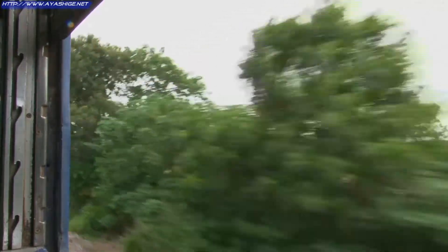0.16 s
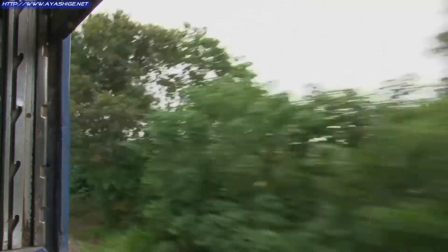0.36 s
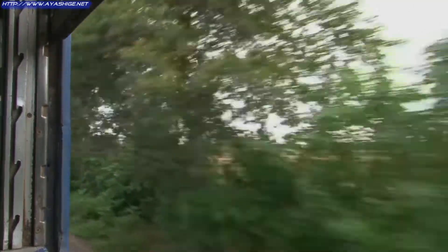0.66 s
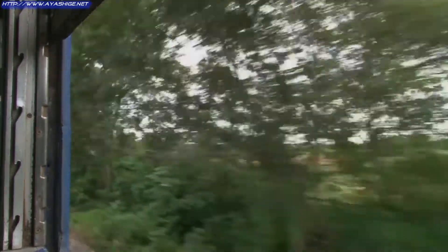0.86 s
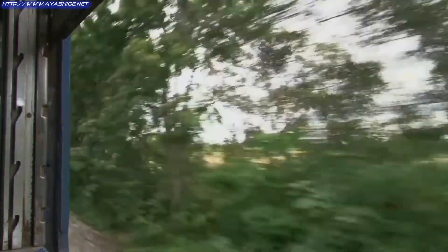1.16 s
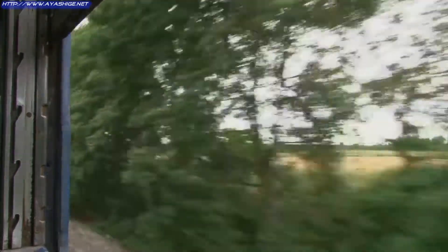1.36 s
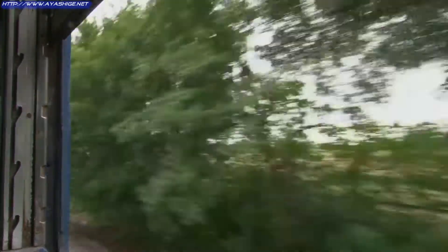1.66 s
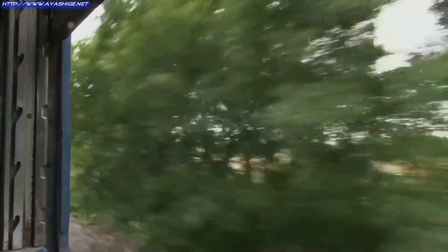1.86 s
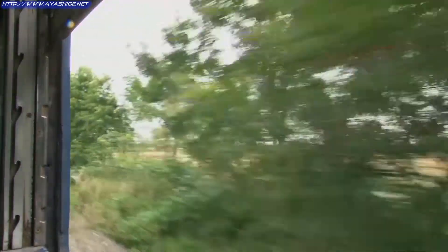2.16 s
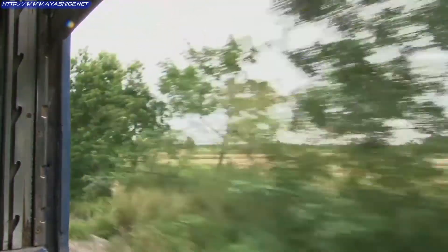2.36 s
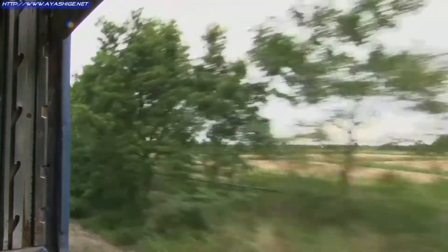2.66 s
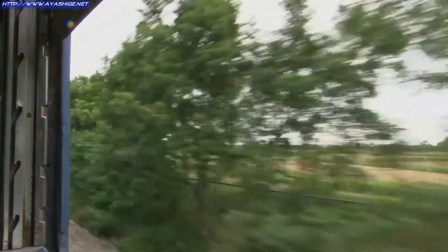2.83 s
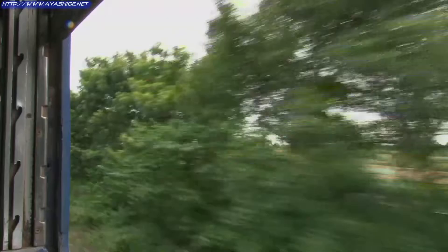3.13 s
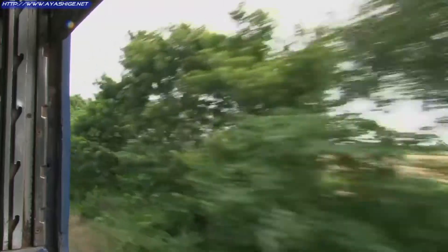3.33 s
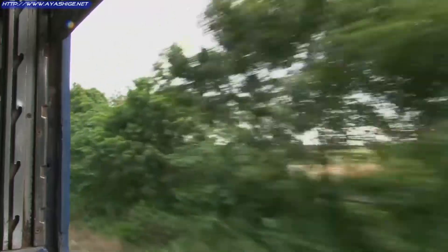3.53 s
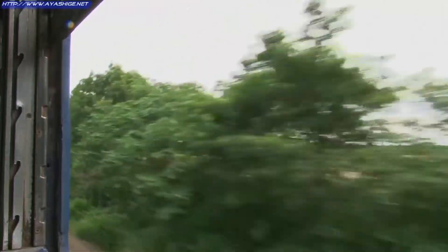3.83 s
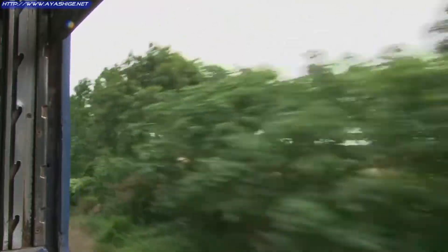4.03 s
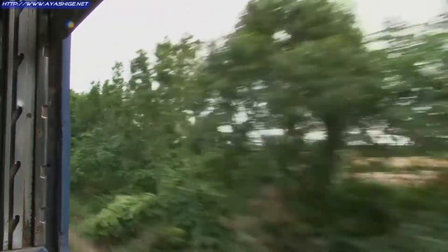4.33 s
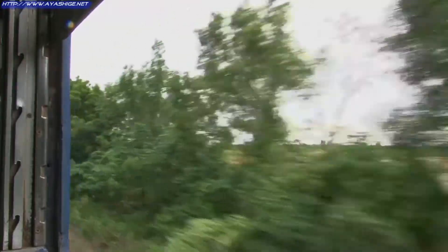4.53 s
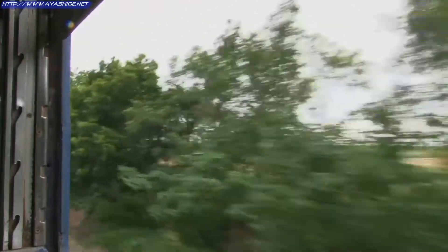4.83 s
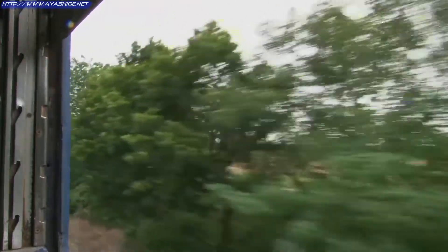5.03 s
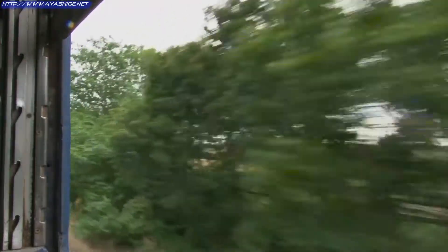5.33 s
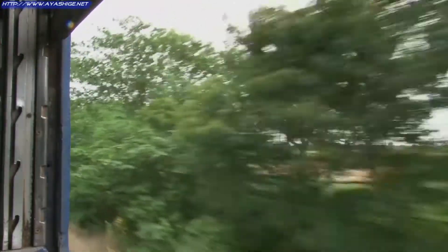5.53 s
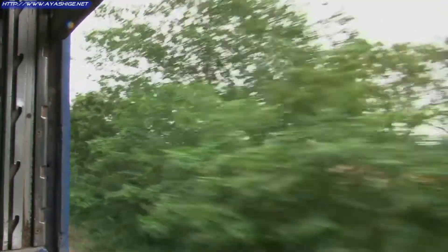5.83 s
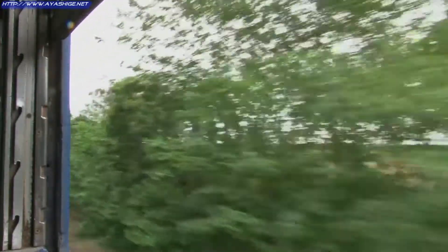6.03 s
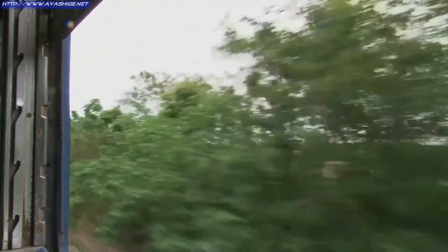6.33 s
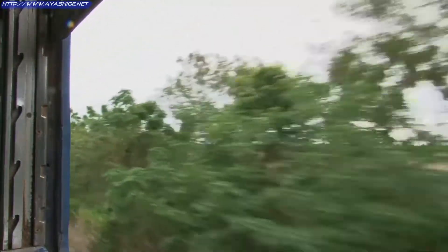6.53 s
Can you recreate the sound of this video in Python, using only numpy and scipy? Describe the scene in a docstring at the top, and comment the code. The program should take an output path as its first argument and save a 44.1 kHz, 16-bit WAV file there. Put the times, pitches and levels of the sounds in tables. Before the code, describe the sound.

Heavy, ragged wind buffets thud on a microphone while a train runs on beneath, its quiet hiss fluttering with the engine and passing trees.

```python
"""At the open window of a moving train, wind buffets a stereo microphone.
About a dozen buffets a second thump on the capsule as random trains of single pressure swings,
with short slaps on top; chokes cut the hearing for an instant.
Behind them shaped noise gives the roar of the wheels and a hiss that throbs with the engine
and swells, in gliding bands, off the passing trees."""
import sys
import numpy as np
from scipy import signal
from scipy.fft import rfft, irfft, next_fast_len
from scipy.io import wavfile
from scipy.ndimage import uniform_filter1d

SR = 44100
rng = np.random.default_rng(int(sys.argv[2]) if len(sys.argv) > 2 else 0)


def bounce(signal):
    """Save signal as a 16-bit WAV file at the path given by the first command-line argument."""
    frames = np.transpose(np.atleast_2d(signal))
    limited = np.clip(frames, -1, 1)
    pcm = np.round(limited * 32767).astype(np.int16)
    wavfile.write(sys.argv[1], SR, pcm)


N = 295029

# wind buffets: peak t/s, nominal level/dB, rise/ms and fall/ms (to 4.4 dB down),
# bass heave/(dB per octave below 160 Hz)
WIND_BUFFETS = [(0, -13, 5, 15.6, -6), (0.144, -19.5, 3.4, 10.4, -8), (0.184, -27.5, 23, 99, 3),
                (0.27, -20, 35, 37, -8), (0.346, -18.5, 19, 30, -7), (0.46, -26.5, 42, 48, 3),
                (0.553, -19.5, 8.2, 19, 0), (0.581, -29, 12, 19, 2.5), (0.712, -16, 26, 9.1, -1),
                (0.753, -14.5, 9.2, 17, -6), (0.817, -23.5, 110, 19, -4), (0.931, -13.5, 12.5, 22.4, -8.5),
                (1.017, -25.5, 11, 14, 2.5), (1.103, -20.5, 3.7, 15, 3), (1.172, -31, 58, 31, -8),
                (1.319, -28, 20, 21, -6), (1.396, -25.5, 25, 9.5, -10), (1.539, -18, 3.7, 24, 6),
                (1.575, -18.5, 17, 23, -18), (1.611, -19, 51, 35, 3), (1.724, -16.5, 16.5, 36, -5.5),
                (1.787, -28, 41, 53, -1), (1.865, -16.5, 18, 18, -4), (1.903, -16, 11, 15, -5),
                (1.966, -21.5, 13, 23, -1.5), (2.081, -18.5, 6.2, 16, 0), (2.135, -26, 23, 38, -1),
                (2.253, -19.5, 22, 35, -2), (2.334, -19.5, 8.2, 15, 0), (2.436, -15.5, 34, 31, -8),
                (2.567, -12.5, 19, 18, -18), (2.605, -20, 24, 20, -6), (2.734, -20.5, 48, 48, -3.5),
                (2.9, -18, 28, 20, -6), (2.958, -16, 26, 10.3, -8), (3.02, -13.5, 8, 12, -24),
                (3.053, -23.5, 9.3, 43, -17), (3.108, -22, 37, 11, 1), (3.228, -18, 20, 35, 0),
                (3.288, -16.5, 16, 19, -11), (3.407, -18.5, 18, 18.4, -4), (3.506, -29, 8.7, 2.1, 4.5),
                (3.653, -15.5, 7.8, 27.3, -1.5), (3.755, -22, 20, 19.6, -8), (3.87, -12.5, 25.4, 22, -3.5),
                (3.924, -19, 36, 14, -5.5), (4.088, -17, 7, 39, -8), (4.229, -15, 20, 25, -7),
                (4.297, -27, 18, 21, 1), (4.453, -16, 16, 21.4, -3), (4.558, -13.5, 4.1, 16, -3),
                (4.628, -15.5, 24, 20.4, -0.5), (4.736, -25, 9.8, 26, 1), (4.825, -30, 36, 24, -3),
                (4.953, -23.5, 37, 22, 1.5), (5.036, -17, 12, 14, -1.5), (5.071, -25.5, 27, 36, -5),
                (5.209, -19.5, 13.4, 9.4, -1), (5.232, -19, 8.1, 4.3, -3), (5.26, -20.5, 14, 39, 0.5),
                (5.493, -13, 21, 8.2, -5), (5.513, -17, 3.9, 16.6, -20), (5.632, -16, 23, 31.4, -1.5),
                (5.821, -13.5, 10.3, 11, -3), (5.85, -20.5, 15, 22.5, -13), (5.985, -18.5, 4, 13, -11),
                (6.017, -15.5, 8.4, 14, -22), (6.047, -28.5, 4.7, 16, 2), (6.086, -18, 1.2, 37, -2),
                (6.208, -34.5, 14, 12, 5), (6.276, -12, 24, 26, -23), (6.383, -24, 9.3, 42, 0),
                (6.481, -15, 18, 18.5, -4), (6.569, -19, 42, 17, -7.5), (6.624, -18, 11, 15, 8.5),
                (6.684, -16.5, 57, 18, -22)]
# relative spectral density of the eddies: f/Hz, level/dB
EDDY_SPECTRUM = [(20, 8), (32, 9), (45, 5.5), (97, 8), (280, -3.5), (556, -13), (886, -21.5), (1410, -35),
                 (2400, -44.5)]
# small eddies differ more between the ports: f/Hz, added side level/dB
EDDY_SIDE_SPECTRUM = [(25, -16), (60, -37), (120, -9), (300, 2.5), (1000, 12), (2400, 21)]
# surges of pressure that pin the capsule: t/s, change of hearing/dB
CAPSULE_CHOKES = [(0.748, -22), (0.7947, -5), (1.542, -13), (1.6098, -44), (1.752, -9), (2.555, -11),
                  (2.575, -18), (2.8918, -15), (3.249, -16), (3.277, -6), (3.895, -17), (4.245, -20),
                  (4.639, -8), (5.4828, -15), (5.609, -32), (5.652, -9), (5.827, -8), (6.2536, -20),
                  (6.4669, -25), (6.632, -9)]
# running noise between the trees: t/s, hiss level/dB, roar level/dB
RUNNING_LEVELS = [(0.0, -38, -39), (0.499, -40.5, -36.5), (0.9, -38, -36.5), (1.05, -37, -36.5),
                  (1.3, -34.5, -37), (1.535, -33.5, -34), (1.548, -33.5, -29), (1.68, -38.5, -42),
                  (2.1, -37.5, -41), (2.42, -35.5, -34.5), (2.55, -40, -43), (3.05, -40, -38),
                  (3.5, -38.5, -42.5), (4.05, -40.5, -41.5), (4.5, -37, -39), (4.72, -38, -34.5),
                  (5.3, -36.5, -36), (5.95, -36, -35.5), (6.45, -35.5, -37.5), (6.69, -36, -35)]
# relative spectral density of the wheel roar: f/Hz, level/dB
ROAR_SPECTRUM = [(25, -9), (100, 5.5), (400, 0.5), (600, 3), (850, -0.5), (1050, 5), (1150, 0.5),
                 (1280, -4.5), (1520, -17), (2200, -49)]
# relative spectral density of the treble hiss: f/Hz, level/dB
HISS_SPECTRUM = [(1100, -4.5), (1520, -12), (1820, -2.5), (2600, -3), (3500, -4), (4200, -4.5),
                 (5100, -6.5), (5900, -7.5), (8530, -13.5), (11000, -26), (14400, -39.5), (15600, -55)]
# stereo width of the running noise: f/Hz, side relative to mid/dB
NOISE_WIDTH = [(100, -19), (400, -50), (1100, -27), (1500, -11), (2300, -18), (2900, -11), (3350, -4),
               (4200, -12.5), (5300, -7), (6400, -9), (7500, -7.5), (9000, -10.5), (11000, -18),
               (12500, -19), (14000, -10)]
# sharpest slaps of air: t/s, nominal swing level/dB, f/Hz, edge level relative to the swing/dB
AIR_SLAPS = [(0.008, -13.5, 487, -12), (0.143, -15.5, 396, -12), (0.285, -15, 407, -12),
             (0.341, -14, 200, -25), (0.3484, -13, 376, -21), (0.459, -20.5, 500, -10),
             (0.545, -15, 358, -17), (0.586, -17, 200, -20), (0.708, -23, 188, -16),
             (0.752, -10.5, 493, -24), (0.816, -15, 190, -18), (0.927, -23, 223, -14),
             (0.9406, -20, 420, -2), (1.107, -29, 250, -12), (1.539, -30, 180, -25), (1.5513, -12, 404, -6),
             (1.6033, -13, 457, 0.5), (1.616, -10.5, 510, -21), (1.7121, -16, 450, -1),
             (1.845, -14, 334, -16), (1.8731, -10, 378, -26), (1.975, -24, 400, 3), (2.082, -23, 230, -16),
             (2.255, -14.5, 506, -5), (2.335, -17, 199, -18), (2.406, -18, 495, -16),
             (2.427, -10, 260, -11), (2.4457, -9, 306, -19), (2.542, -19, 400, -14), (2.5568, -8, 746, -6),
             (2.58, -14, 315, -23), (2.608, -10.5, 260, -11), (2.756, -13, 230, -23),
             (2.894, -16, 400, -10), (2.959, -25, 320, -14), (3.0247, -27, 460, -22),
             (3.107, -15.5, 200, -22), (3.216, -19, 300, -10), (3.29, -25, 352, -12),
             (3.299, -18, 314, -16), (3.4013, -11.5, 440, -11), (3.651, -15, 255, -14),
             (3.673, -15, 316, -6), (3.846, -21, 400, -15), (3.8604, -4.5, 510, -21), (3.8735, -6, 565, -2),
             (3.915, -10.5, 590, -13), (4.098, -13.5, 447, -5), (4.208, -19, 200, -16),
             (4.2223, -37, 299, 7), (4.239, -24, 345, -11), (4.4436, -17.5, 463, -4),
             (4.469, -12, 340, -21), (4.5562, -9, 288, -23), (4.57, -15, 476, -16), (4.613, -16, 390, -12),
             (4.6311, -9, 338, -10), (4.959, -22, 229, -14), (5.03, -14, 238, -25), (5.0372, -9, 335, -17),
             (5.2, -16.5, 292, -16), (5.26, -19, 300, -10), (5.468, -11, 310, -21), (5.4892, -7, 376, -5),
             (5.516, -13, 230, -20), (5.525, -14, 231, -18), (5.6138, -17, 300, -18),
             (5.6246, -16, 440, -2), (5.6459, -15, 396, -2), (5.809, -16, 420, -7),
             (5.8152, -12.5, 403, -25), (5.8298, -11, 300, -16), (5.832, -13, 302, -14),
             (5.857, -13, 360, -16), (6.016, -12.5, 264, -13), (6.0889, -6.5, 346, -8),
             (6.1033, -21, 443, -11), (6.256, -20, 402, -16), (6.274, -8.5, 256, -8), (6.281, -15, 380, -2),
             (6.2934, -18, 334, 1), (6.3, -14, 400, -8), (6.384, -15, 200, -18), (6.474, -29, 350, -10),
             (6.4809, -13.5, 362, -19), (6.4931, -23, 530, 2), (6.651, -34, 505, -17),
             (6.675, -20, 360, -9)]
# uneven firing of six cylinders: t into the engine cycle/ms, relative puff level/dB
CYLINDER_FIRINGS = [(2, 3.2), (16, 3.4), (26, 3.3), (40, 1.8), (50, 1.6), (64, 1.7)]
# phase of the ports: f/Hz, lead of left over right/rad
PORT_PHASE = [(0, 0), (800, 0), (1210, -0.1), (1720, -0.9), (3100, 0.9), (3790, -0.6), (5080, 0.8),
              (6200, -0.1), (7490, 0.6), (10700, 0), (15200, 0)]
# balance of the ports: f/Hz, left minus right/dB
PORT_LEVEL = [(30, 1.5), (60, -1), (130, -0.4), (290, -1), (640, 0), (1220, 1.5), (2000, -2), (3300, 0),
              (6820, 0), (15000, 0.5)]
# trees that throw the hiss back: t/s, swell of the whole hiss/dB, nominal extra in the brightest band/dB,
# length either side of the peak (to 1/e)/ms, brightest f/Hz, glide/(octaves per length)
PASSING_TREES = [(0.01, 4, -4, 9.1, 4000, 0), (0.33, 2, 2.5, 130, 2400, -0.052),
                 (0.6, 4, 3, 103, 2540, 0.34), (0.68, -1, 6, 35, 6000, -.1), (0.71, 2.5, 6.5, 83, 2570, 0),
                 (0.84, 3, 6, 36, 2970, 0), (0.91, 3.5, 0, 28, 2500, 0), (1.1, 1.5, 1, 130, 3500, 0),
                 (1.03, 1.5, 1.5, 70, 2300, -0.15), (1.25, 0.5, 4.5, 110, 2050, 0),
                 (1.33, -0.5, 2.5, 110, 3260, 0), (1.4, 0, 3.5, 47, 3550, 0), (1.46, 2.5, 2, 37, 2900, 0),
                 (1.49, 1, 2, 85, 2280, 0.14), (1.48, 0.5, 1.5, 33, 4950, 0.039),
                 (1.52, 2.5, -2.5, 21, 5500, 0), (2.25, 0, 5, 28, 3900, -0.062),
                 (2.295, 0.5, 4, 23, 5800, -0.036), (2.285, -0.5, 4, 25, 5000, -0.043),
                 (2.295, 4.5, 3, 68, 2850, -0.31), (2.36, -1.5, 6, 48, 2080, -.15),
                 (2.425, 2.5, 3, 24, 4530, 0), (2.88, -0.5, 7, 25, 5540, -0.048),
                 (2.92, 3, 5, 110, 2420, -0.21), (3.2, 1.5, 5, 23, 4700, 0.08), (3.28, 3, -5, 32, 3000, 0),
                 (3.33, 0.5, 5, 45, 5900, 0.05), (3.4, 0.5, 6.5, 43, 2360, 0),
                 (3.6, 2.5, 3.5, 49, 3200, 0.042), (3.68, 0, 9, 28, 2500, -0.3),
                 (3.73, 3.5, 3, 100, 3300, 0.29), (3.85, 1.5, 1, 45, 9000, 0.13),
                 (3.97, 1.5, 2, 32, 4300, 0), (4.135, 1.5, 8, 21, 5900, 0),
                 (4.175, 0.5, 8, 40, 2160, -0.11), (4.178, 2.5, 4, 18, 2680, 0.052),
                 (4.225, 2, 6, 10, 2200, 0), (4.26, 2, 11, 48, 2720, -0.079), (4.585, 3, 4, 17, 4200, 0),
                 (4.6, 2, 3.5, 30, 6500, -.2), (4.645, 4.5, 2, 35, 3960, 0), (4.71, 1.5, 6, 20, 4000, 0),
                 (4.775, 1.5, 5, 39, 5900, 0.027), (4.78, -0.5, 3, 20, 4000, 0),
                 (4.845, 1, 4, 57, 7360, -0.47), (4.87, 2, 3, 28, 5800, 0.12), (4.95, 3, 1, 39, 4800, 0),
                 (5.0, 2, 2, 40, 2840, 0), (5.18, 3.5, 3.5, 82, 3500, -0.14),
                 (5.39, -1, 6, 36, 3400, 0.096), (5.43, 3.5, 4, 66, 5500, -0.11),
                 (5.57, 1.5, 3.5, 21, 4100, 0), (5.78, 0.5, 5, 30, 4600, 0), (5.75, 2, 2, 23, 3200, 0),
                 (6.0, 1, 6, 25, 4250, 0.089), (6.08, 3, 2, 27, 4300, -0.063), (6.13, 2, 2.5, 30, 4300, 0),
                 (6.2, 2.5, -1, 58, 3000, 0), (6.29, 3, 4, 9.2, 2170, -0.071),
                 (6.36, 1.5, 0, 58, 3500, 0.045), (6.52, 2.5, 3, 20, 3750, 0.053),
                 (6.52, 0.5, 3, 25, 6200, 0)]
# firings that spit loudest in the treble: t/s, extra relative puff level/dB
TREBLE_SPITS = [(1.012, -2), (1.46, -0.5), (1.533, 4.5), (2.405, 2), (2.878, 6.5), (3.175, 5), (3.263, 0),
                (3.343, 3.5), (3.851, 1), (3.862, 6), (3.875, 2), (4.138, 1.5), (4.572, 4.5), (4.644, 3),
                (4.752, 3), (4.777, 6.5), (4.826, 4), (4.836, 7), (4.764, 1), (4.788, 4), (4.851, 4),
                (4.86, 1), (5.365, 1.5), (5.871, 1), (6.062, 4), (6.487, 2)]

EDGE_HZ = 15100  # upper band limit
CYCLE_HZ = 13.858  # engine cycles per second
PUFF_CHANCE = 0.5  # spread of the puffs, as a share of their dB
USUAL_DB, DRAUGHT_DB = -21.5, -49  # a usual buffet; the draught that never stops
SHARP, SHARP_PER_MS = 0.23, 0.023  # dB per octave above 160 Hz; longer buffets carry more small eddies
SHARP_PER_DB = 0.1518  # and so do stronger ones
SIDE_DB, SIDE_PER_DB = -13.5, -0.3  # strong buffets hit both ports more alike
FLUTTER_DB, FLUTTER_MS = 2.8, 8  # buffets break into flutters: rms depth, window length
DRAUGHT_LUMP_DB = 4  # the draught comes in lumps: rms depth
BLUNT = 2.6  # buffets start and stop abruptly (2 = bell shape)
EDDIES_PER_CYCLE = 1.3  # sparse enough that single swings stand out
CHOKE_MS = 4.2  # full width, to 1/e of the depth in dB
SWISH_OCTAVES = 0.3  # half-width (to 1/e) of a tree's brightest band
STREAK_OCTAVES, STREAK_SHARE = 0.09, 0.18  # a thin streak in its middle
SPLASH_DB = -15  # splash up into the treble, relative to a slap's edge
EDGE_SKEW = 0.54  # largest phase difference of the edge between the ports (cycles)
SLAP_TURN = 0.45  # spread of the slaps' shape (cycles)
SLAP_PAN_DB, SLAP_STRAY_DB = 4, -2.5  # left minus right from 420 Hz up: mean, largest stray


def gain_of(db):
    """Logarithmic level: 20 dB is a tenfold amplitude."""
    return 10 ** (np.asarray(db) / 20)


def evened(x):
    """Normalisation by mean power: scales to rms 1."""
    return x / np.sqrt(np.mean(x ** 2) + 1e-20)


def read(points, hz):
    """Interpolation of a spectrum along a logarithmic frequency axis."""
    f, value = np.transpose(points)
    return np.interp(np.log(hz + 1), np.log(f + 1), value)


def stereo(mid, side):
    """Sum and difference: mid and side give left and right."""
    return np.array([mid + side, mid - side])


def bunching(depth_db, length):
    """Multiplicative intermittency: smoothed noise in dB becomes a fluctuating gain."""
    smooth = signal.oaconvolve(rng.standard_normal(N), np.hanning(length), "same")
    return gain_of(depth_db * evened(smooth))


def wind():
    """Turbulence as shot noise: eddies of many sizes strike as single swings while a buffet lasts."""
    s, db, rise, fall, heave = np.transpose(WIND_BUFFETS)
    sharp = SHARP + SHARP_PER_MS * (rise + fall) + SHARP_PER_DB * (db - USUAL_DB)
    side_db = SIDE_DB + SIDE_PER_DB * (db - USUAL_DB)
    step = 32  # samples between control points
    t = np.arange(0, N + step, step) / SR
    late_ms = 1000 * (t[:, None] - s)
    lateness = abs(late_ms / np.where(late_ms < 0, rise, fall))
    power = gain_of(db - 4.4 * np.minimum(lateness ** BLUNT, 20)) ** 2
    share = power / power.sum(1, keepdims=True)  # the strongest buffet of the moment sets the colour
    lumps = evened(uniform_filter1d(rng.standard_normal(len(t)), size=30))
    draught = gain_of(DRAUGHT_DB + DRAUGHT_LUMP_DB * lumps)
    controls = (np.sqrt(power.sum(1) + draught ** 2), share @ sharp, share @ heave, share @ side_db)
    force, sharp, heave, side_db = (np.interp(np.arange(N) / SR, t, c) for c in controls)
    clump = bunching(1.85, 256)  # eddies come in bunches
    flutter = bunching(FLUTTER_DB, round(FLUTTER_MS * SR / 1000))
    force = force * evened(flutter)
    sizes_hz = np.geomspace(26, 3300, 15)
    norm = np.sqrt(np.sum(sizes_hz * gain_of(read(EDDY_SPECTRUM, sizes_hz)) ** 2))
    out = np.zeros((2, N))
    for hz in sizes_hz:
        u = np.arange(-2 * SR / hz, 2 * SR / hz) * hz / SR  # time in cycles
        swing = np.hanning(len(u)) * np.exp(-(u / 0.61) ** 2) * np.sin(2 * np.pi * u)
        hits = rng.choice([-1., 1.], (2, N)) * (rng.random((2, N)) < EDDIES_PER_CYCLE * hz / SR)
        octaves = np.log2(hz / 160)
        tilt_db = octaves * sharp if octaves > 0 else -octaves * heave
        colour = gain_of(read(EDDY_SPECTRUM, hz) + tilt_db) * np.sqrt(hz) / norm
        clumping = np.clip(min(hz / 200, 450 / hz), 0, 1)  # strongest for middle sizes
        size = force * clump ** clumping * colour
        trains = signal.oaconvolve(hits, swing[None], "same")
        steady = abs(uniform_filter1d(trains ** 2, round(3.0 * SR / hz))) + 1e-9
        trains = evened(trains / steady ** 0.21)  # a buffet keeps a steady supply of eddies
        out += size * trains * [np.ones(N), gain_of(side_db + read(EDDY_SIDE_SPECTRUM, hz))]
    return stereo(*out)


def noise(db):
    """Gaussian noise shaped by a dB field over frequency and time, with a width set by frequency."""
    hz = np.fft.rfftfreq(512, 1 / SR)
    a, b, c, d = rng.standard_normal((db.shape[1], 257, 4)).T
    mid = a + 1j * b
    side = gain_of(read(NOISE_WIDTH, hz))[:, None] * (c + 1j * d)
    spectra = np.array([mid, side]) * gain_of(db)
    return stereo(*signal.istft(spectra, nperseg=512, noverlap=384)[1][:, :N])


def patches(frames, bins, long):
    """Local correlation: averaged noise leaves random blotches over frequency and time."""
    across = uniform_filter1d(rng.standard_normal((frames, 257)).T, bins, 0)
    return evened(uniform_filter1d(across, long, 1))


def roar():
    """Rolling noise: wheels on rails, filtered by the car body into a mostly low-pass spectrum."""
    frames, hz = N // 128 + 5, np.fft.rfftfreq(512, 1 / SR)
    blotches_db = 2.2 * patches(frames, bins=3, long=16) + 1.2 * patches(frames, bins=12, long=24)
    sound = evened(noise(read(ROAR_SPECTRUM, hz)[:, None] + blotches_db))
    s, _, db = np.transpose(RUNNING_LEVELS)
    return sound * gain_of(np.interp(np.arange(N) / SR, s, db))


def hiss():
    """Reflection and modulation: trees swell the treble noise, and the engine throbs it most up high."""
    frames, hz = N // 128 + 5, np.fft.rfftfreq(512, 1 / SR)[:, None]
    s, db, _ = np.transpose(RUNNING_LEVELS)
    open_db = read(HISS_SPECTRUM, hz)
    field = open_db + trees_db(np.arange(frames) * 128 / SR, hz)
    # what the trees add overall
    swell = np.sqrt(np.mean(gain_of(field) ** 2) / np.mean(gain_of(open_db) ** 2))
    blotches_db = 2.03 * patches(frames, bins=2, long=12) + 0.3 * patches(frames, bins=60, long=4)
    sound = swell * evened(noise(field + blotches_db))
    low = signal.sosfiltfilt(signal.butter(1, 4500, fs=SR, output="sos"), sound)
    top = signal.sosfiltfilt(signal.butter(2, 11000, "highpass", fs=SR, output="sos"), sound)
    middle = sound - low - top
    puffs_db = firing_db()
    sound = low * gain_of(0.31 * puffs_db) + middle * gain_of(1.4 * puffs_db) + top * gain_of(1.9 * puffs_db)
    return sound * gain_of(np.interp(np.arange(N) / SR, s, db))


def firing_db():
    """Periodic pulse modulation: the level puffs up at every firing, each puff a little different."""
    cycles = np.arange(N / SR * CYCLE_HZ)[:, None] / CYCLE_HZ
    ms, db = np.transpose(CYLINDER_FIRINGS)
    at = ((cycles + ms / 1000) * SR).astype(int)
    train = np.zeros(N + SR)
    train[at] = db * (1 + PUFF_CHANCE * rng.standard_normal(at.shape))
    for s, extra_db in TREBLE_SPITS:
        train[round(s * SR)] += extra_db
    puff = np.exp(-(np.arange(-400, 401) / SR / 0.003) ** 2)
    puffs = signal.oaconvolve(train, puff, "same")[:N]
    return puffs - puffs.mean()


def slaps():
    """Pressure transient: a sudden swing about a cycle long, with a crisp edge and a treble splash."""
    out, t = np.zeros((2, N + 800)), np.arange(-400, 400) / SR
    chances = rng.random((len(AIR_SLAPS), 3))
    for (s, db, hz, edge_db), (turn, edge_turn, stray) in zip(AIR_SLAPS, chances):
        # the half-cycle offset makes slaps mostly suck the capsule outward
        swing_cycles = hz * t + .5 + SLAP_TURN * (turn - .5)
        swing = np.exp(-(t * hz / 0.5) ** 2) * np.cos(2 * np.pi * swing_cycles)
        skew = EDGE_SKEW * (stray - .5) * np.array([[1], [-1]])  # reaches one port a little early
        edge = np.exp(-(t / 0.00048) ** 2) * np.cos(2 * np.pi * (1250 * t + edge_turn + skew))
        splash = np.exp(-(t / 0.00027) ** 2) * np.cos(2 * np.pi * (2300 * t + 2 * edge_turn))
        sound = swing + gain_of(edge_db) * (edge + gain_of(SPLASH_DB) * splash)
        pan_db = SLAP_PAN_DB + SLAP_STRAY_DB * (2 * stray - 1)
        pan_db *= min(hz / 420, 1) ** 2  # deep slaps reach both ports alike
        out[:, round(s * SR):][:, :len(t)] += gain_of(db + np.array([[.5], [-.5]]) * pan_db) * sound
    return out[:, 400:N + 400]


def trees_db(t, hz):
    """Reflection from passing bodies: each tree changes the whole hiss and one band that may glide."""
    field = np.zeros((len(hz), len(t)))
    for s, db, swish_db, ms, top_hz, glide in PASSING_TREES:
        late = 1000 * (t - s) / ms  # in lengths of the swell
        off = (np.log2((hz + 1) / top_hz) - glide * late) / SWISH_OCTAVES
        streak = np.exp(-(off * SWISH_OCTAVES / STREAK_OCTAVES) ** 2)
        band = (1 - STREAK_SHARE) * np.exp(-off ** 2) + 2 * STREAK_SHARE * streak
        field += np.exp(-late ** 2) * (db + swish_db * band)
    return field


def choked(dry):
    """Loss of sensitivity: a pinned capsule goes deaf, though slow pressure still moves it."""
    t, hearing_db = np.arange(N) / SR, np.zeros(N)
    for s, db in CAPSULE_CHOKES:
        hearing_db += db * np.exp(-((t - s) * 2 / (CHOKE_MS / 1000)) ** 4)
    slow = signal.lfilter([.02], [1, -.98], dry)
    return gain_of(hearing_db) * (dry - slow) + gain_of(0.18 * hearing_db) * slow


def scene():
    """Superposition: wind on the capsule over the running train."""
    return wind() + slaps() + roar() + hiss()


def record(dry):
    """Transduction: chokes, then port colour, bass roll-off, soft overload and band limit."""
    heard = choked(dry)
    size = next_fast_len(N)
    hz = np.fft.rfftfreq(size, 1 / SR)
    # each port takes half the difference, in opposite senses
    port = gain_of(read(PORT_LEVEL, hz) / 2) * np.exp(.5j * read(PORT_PHASE, hz))
    heard = irfft(rfft(heard, size) * [port, 1 / port], size)[:, :N]
    heard = signal.sosfilt(signal.butter(3, 33, "highpass", fs=SR, output="sos"), heard)
    heard = .7 * np.tanh(heard / .7)
    band_limit = signal.firwin(511, EDGE_HZ, window=("kaiser", 9), fs=SR)
    return signal.oaconvolve(heard, band_limit[None], "same")


dry = scene()
out = record(dry)
bounce(out)
```